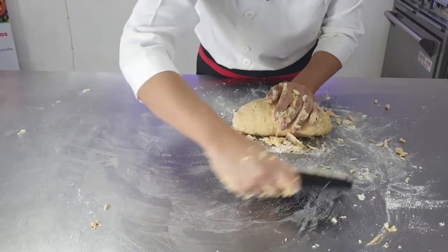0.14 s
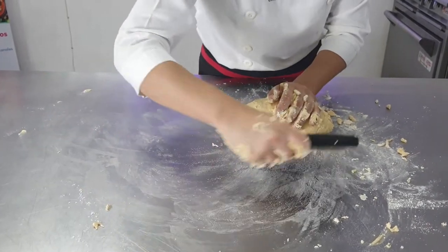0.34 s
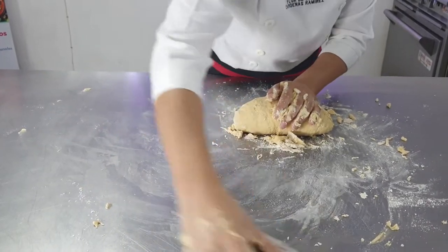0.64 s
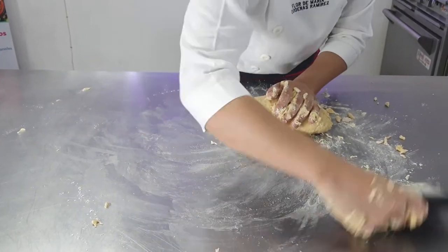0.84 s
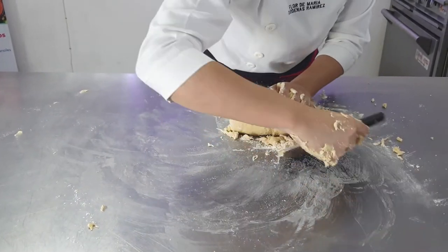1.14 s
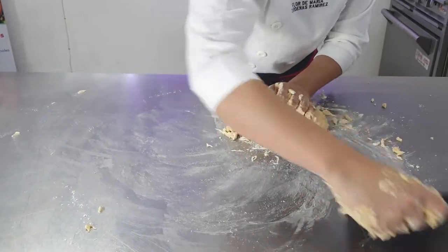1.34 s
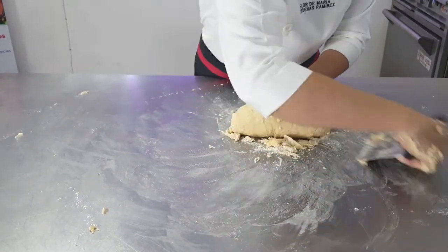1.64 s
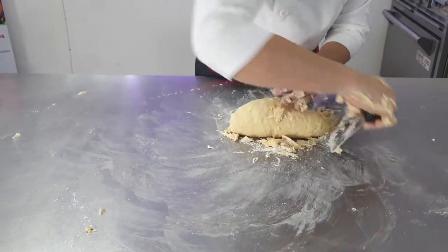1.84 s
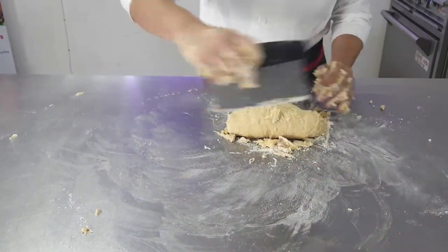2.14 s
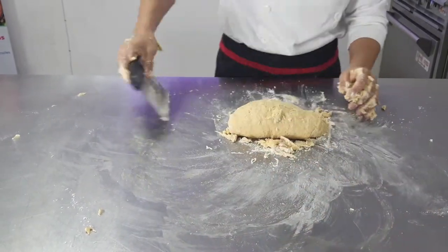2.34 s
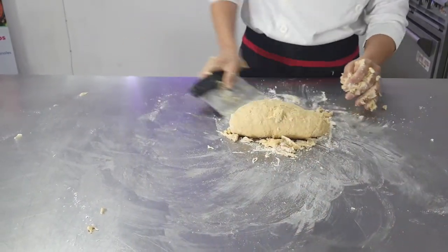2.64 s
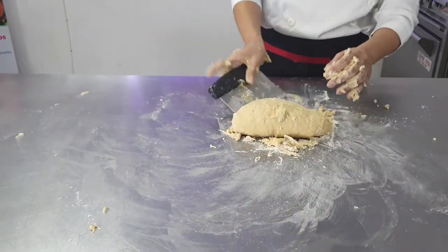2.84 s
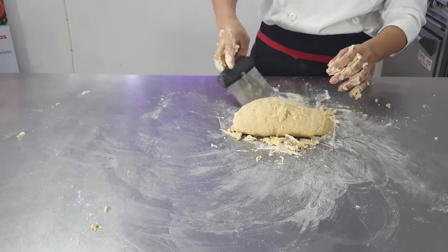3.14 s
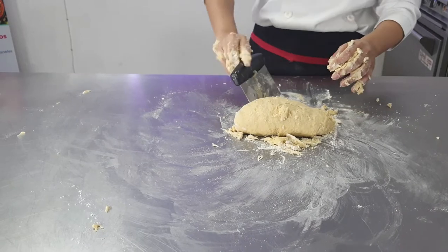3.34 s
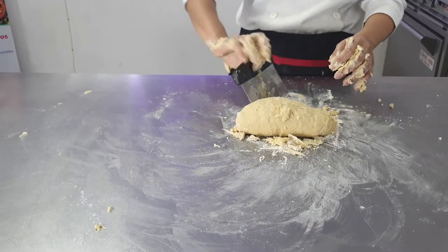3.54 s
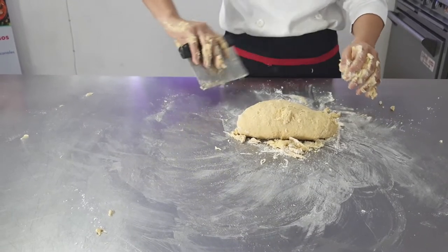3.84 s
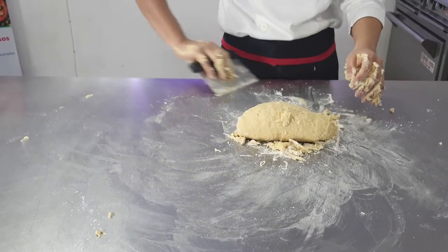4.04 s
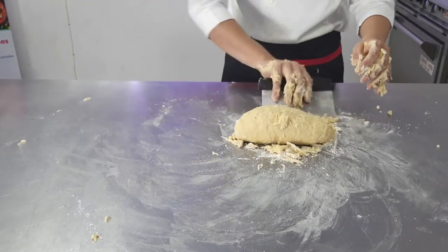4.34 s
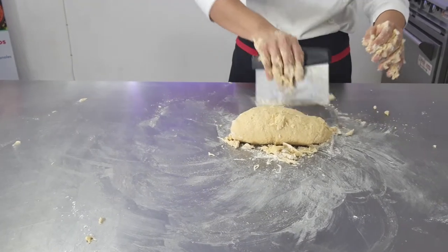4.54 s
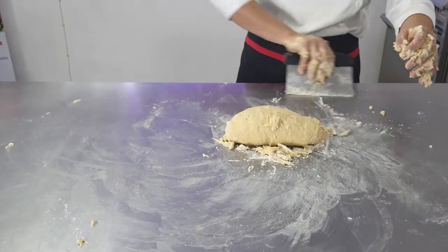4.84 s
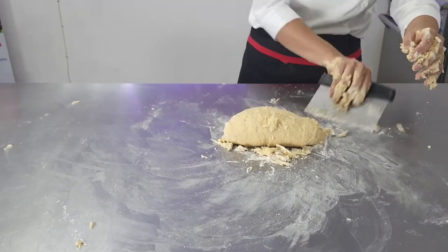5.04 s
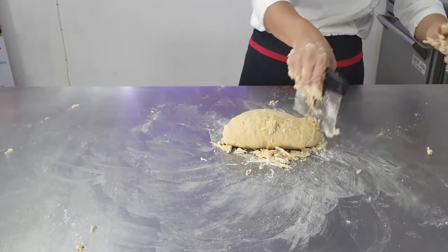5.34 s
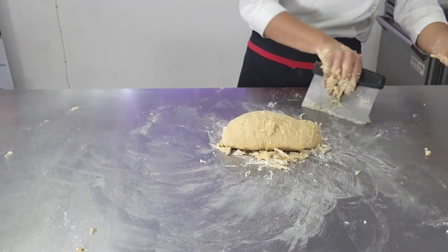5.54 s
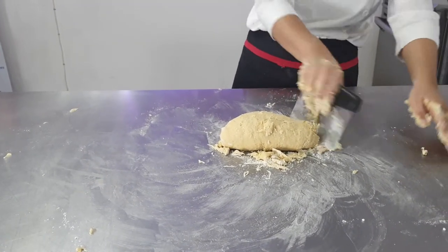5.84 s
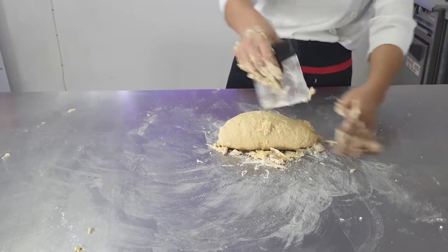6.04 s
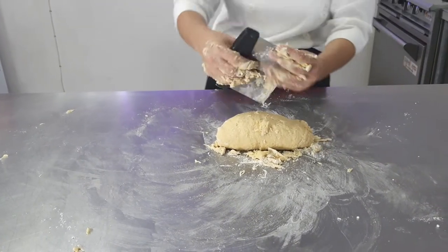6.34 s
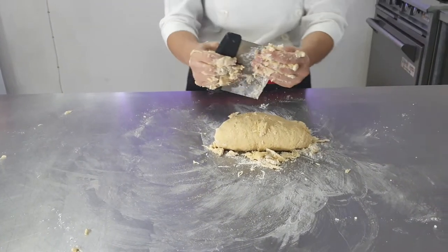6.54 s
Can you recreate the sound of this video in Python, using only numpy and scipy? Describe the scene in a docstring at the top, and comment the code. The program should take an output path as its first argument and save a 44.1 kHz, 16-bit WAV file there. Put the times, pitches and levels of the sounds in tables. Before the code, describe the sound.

A metal bench scraper lands with hollow clangs on a floured steel table and scrapes in short, hissing, raspy strokes in a quiet kitchen.

```python
"""A hard-walled kitchen with a low ventilation hum; a steel bench scraper works on a floured steel table.
Each landing rings the sheet top: summed decaying modes plus a crowd of upper modes made from noise.
Strokes toward the dough are shaped noise: bright flour hiss, steel rasp and the hand-damped blade's ring.
Catches ring the blade briefly, soft handling adds rubs, and the top rumbles under pushes and leaning weight."""
import sys
import numpy as np
from scipy import signal
from scipy.fft import rfft, irfft, next_fast_len
from scipy.io import wavfile

SR = 44100
rng = np.random.default_rng(int(sys.argv[2]) if len(sys.argv) > 2 else 0)


def write(x):
    x = np.atleast_2d(x).T
    wavfile.write(sys.argv[1], SR, np.round(np.clip(x, -1, 1) * 32767).astype(np.int16))

N = 294279
T = np.arange(N) / SR  # seconds

# Pushes of the edge toward the dough. Each row: fastest at in seconds, speeding up in seconds,
# slowing down in seconds, then relative levels in dB of flour hiss, rasp, blade ring and final bite,
# and extra lower hiss of a flat-held blade in dB.
STROKES = [(0.172, 0.23, 0.11, -36.5, -34, -44, -51, 6.5), (0.841, 0.27, 0.25, -33, -41.5, -36, -37, 6.5),
           (1.575, 0.2, 0.25, -28, -38, -43, -42, 3.5), (2.661, 0.24, 0.135, -35.5, -41.5, -45.5, -51.5, 1),
           (4.199, 0.2, 0.27, -39, -51, -66.5, -46, -4), (5.03, 0.18, 0.2, -30, -39, -54, -44, -1),
           (5.71, 0.13, 0.14, -36.5, -45.5, -62.5, -45.5, -4),
           (6.048, 0.18, 0.16, -46.5, -58, -83, -61, -1)]
# Blade lands on a corner, falls flat, then the heel of the hand settles. Each row: start in seconds,
# flat after in seconds, settled after in seconds, boom of the top in dB, corner clang in dB,
# flat clang in dB, edge tick in dB, extra of the deep belly modes in dB, hardness in dB per octave,
# favoured pitch of the spot in Hz, ring length as a factor.
LANDINGS = [(-0.1, 0.018, 0.04, -32.5, -48, -38.5, -60, -12.5, -13.5, 310, 1.8),
            (0.593, 0.018, 0.04, -26, -29.5, -31.5, -51, -2, 0.5, 338, 0.75),
            (1.378, 0.015, 0.071, -25, -35.5, -38, -58, 0, -4, 317, 0.85),
            (2.422, 0.02, 0.05, -24, -27.5, -29.5, -43, -5, 2.7, 680, 0.86),
            (2.886, 0.006, 0.012, -63.5, -53.5, -63.5, -64.5, 1, 1, 546, 0.053),
            (3.974, 0.026, 0.053, -23, -26, -33.5, -61, 1, 0.5, 900, 0.9),
            (4.312, 0.012, 0.03, -46.5, -37, -40.5, -47, 3.5, 0.5, 992, 0.6),
            (4.805, 0.02, 0.036, -28, -34.5, -30, -58.5, 10.5, -1, 592, 0.92),
            (5.547, 0.011, 0.057, -25.5, -31.5, -24, -54.5, 4.5, 0, 900, 0.78)]
# Edge catches on dried dough and springs free. Each row: start in seconds, blade ring in dB,
# snap in dB, ring t60 in seconds.
CATCHES = [(0.085, -41.5, -68.5, 0.22), (0.17, -34.5, -43.5, 0.18), (0.775, -28, -30.5, 0.065),
           (0.799, -46, -27, 0.043), (1.488, -40, -45, 0.19), (1.55, -32, -32.5, 0.24),
           (2.077, -82.5, -65, 0.025), (2.271, -81.5, -76, 0.03), (2.606, -45, -60, 0.098),
           (4.096, -42, -58, 0.17), (4.132, -63, -47.5, 0.045), (4.324, -40, -52, 0.12),
           (4.96, -42.5, -45.5, 0.3), (6.161, -58, -66, 0.09)]
# Short drags over flour and dough. Each row: centre in seconds, half length in seconds,
# relative hiss in dB, relative rasp in dB.
BRUSHES = [(0.77, 0.035, -35.5, -42.5), (0.803, 0.039, -29, -48), (2.11, 0.12, -60.5, -70),
           (2.925, 0.11, -64.5, -63), (2.986, 0.055, -54, -62), (3.22, 0.071, -61, -59),
           (3.372, 0.065, -64.5, -75.5), (3.62, 0.08, -74, -92), (3.838, 0.06, -70.5, -67),
           (3.927, 0.065, -72, -73.5), (4.127, 0.059, -51, -42), (4.496, 0.081, -63, -69),
           (5.439, 0.22, -73, -75.5), (6.602, 0.11, -66.5, -81), (6.665, 0.045, -65, -64.5)]
# Soft bumps, pats and rubs of hands, sleeve and dough. Each row: start in seconds, centre in Hz,
# level in dB, rise in seconds.
HANDLING = [(2.07, 2080, -68, 0.038), (2.27, 498, -59, 0.0036), (2.937, 1920, -75, 0.071),
            (3.106, 300, -48.5, 0.013), (3.19, 1930, -79, .025), (3.351, 4030, -66, 0.023),
            (5.143, 760, -41, 0.007), (5.15, 300, -43, 0.027), (5.96, 1541, -62.5, 0.017),
            (6.304, 423, -57.5, 0.041), (6.366, 385, -63, 0.03), (6.481, 1070, -68, 0.02)]
# The cook's weight shifts on the top. Each row: centre in seconds, half length in seconds, rumble in dB.
LEANS = [(0.362, 0.15, -38.5), (0.637, 0.11, -32), (2.053, 0.23, -43.5), (2.325, 0.17, -42),
         (2.882, 0.22, -36), (3.243, 0.37, -42.5), (4.068, 0.16, -34.5), (4.714, 0.19, -45.5),
         (5.384, 0.31, -42.5), (6.408, 0.18, -41)]
# Modes of the steel top. Each row: frequency in Hz, relative level in dB, t60 in seconds before scaling.
TOP_MODES = [(66.8, -7, .7), (91, -5.5, 0.23), (127, 5.5, 0.19), (148, -4.5, 0.96), (173, -6, 0.45),
             (184.3, -6.5, 0.65), (246, -4.5, 0.2), (267.3, -4, 0.49), (306.6, 5, 0.22),
             (297.5, -1.5, 0.89), (311.4, -2, 1), (318, -1, 0.21), (361.7, -1, 0.3), (386.5, -6, 0.55),
             (425.6, -5, 0.17), (537.5, -12.5, 0.52), (609, -11.5, 0.45), (663.7, -14.5, 0.41),
             (897, -21, 0.77), (1077, -13.5, 0.25)]
# Crowded upper modes of the top. Each row: frequency in Hz, relative level in dB.
CLANG_SPECTRUM = [(100, -13), (300, -3), (470, -4.5), (700, 5), (830, -5.5), (1100, -3.5), (1450, -7.5),
                  (1750, -9), (2050, -8), (2900, -22), (4300, -27), (6000, -44.5), (16000, -49)]
# Their decay. Each row: frequency in Hz, t60 in seconds before the landing's length factor.
CLANG_T60 = [(200, 1), (700, 0.11), (2000, 0.33), (8000, 0.75)]
# Modes of the hand-damped blade. Each row: frequency in Hz, width in Hz, relative level in dB.
BLADE_MODES = [(866, 53, -2), (1083, 180, 5), (1246, 260, -1.5), (1620, 110, -3.5), (2030, 200, -0.5),
               (2580, 110, -18.5), (3620, 140, -8), (3980, 240, -17), (4130, 1000, -15)]
# Spectra of edge snap, flour hiss, steel rasp, flexing top and moving air.
# Each row: frequency in Hz, relative level in dB.
SNAP_SPECTRUM = [(300, -25), (1500, -9.5), (4200, 2.5), (6000, -6.5), (8200, 3), (12000, -7.5),
                 (16000, -5.5)]
HISS_SPECTRUM = [(1000, -28), (4000, -5), (6000, -11), (8200, -6.5), (9500, -6.5), (10700, -3), (11700, 1),
                 (12600, -4), (13500, -0.5), (14500, -9), (16000, -3)]
RASP_SPECTRUM = [(100, -24), (300, 7), (520, 0), (750, 5.5), (1100, -3.5), (1500, -0.5), (2100, 3),
                 (2900, -3.5), (4000, -5.5), (5500, -9), (8000, -14), (16000, -48)]
FLEXING_SPECTRUM = [(25, -35.5), (40, -31.5), (56, 5), (70, 0.5), (90, 1.5), (115, -6.5), (160, -22.5),
                    (300, -25), (450, -34.5), (1000, -57)]
AIR_SPECTRUM = [(25, -35), (40, 2), (60, -6), (130, -8.5), (200, -24), (260, -22.5), (400, -29), (700, -34),
                (1100, -44.5), (1900, -36), (2600, -51), (6000, -54.5), (8000, -49.5), (16000, -63.5)]
# Ventilation hum. Each row: frequency in Hz, mean level in dB.
HUM = [(59.2, -57), (231.5, -67)]
# Likeness of the two microphone ports. Each row: frequency in Hz, likeness 0-1.
LIKENESS = [(60, .99), (300, .98), (500, .65), (1000, .2), (2000, .04), (16000, 0)]
# Colour of the ports. Each row: frequency in Hz, left minus right in dB.
PORTS = [(60, -5.5), (200, -6), (400, -3.5), (750, -4.5), (1100, -6.5), (1550, -7.5), (2100, -4.5),
         (3000, -3.5), (6400, 1), (8200, -6), (10200, -3), (11600, -6), (12800, -2), (15500, -2.5)]
# Decay of the room. Each row: frequency in Hz, t60 in seconds.
KITCHEN_T60 = [(100, 0.93), (1000, 0.39), (4000, 0.077), (14000, 0.3)]

AIR_DB = -55.5
TOP_HZ = 15900  # upper band limit
STROKE_EDGE_DB = 29  # fall of an arch after its rise or fall time
HISS_ARCH, RASP_ARCH = 2.01, 1.34  # exponents: higher is flatter on top
RASP_SPAN = 1.235  # rasp needs less speed, so lasts this much longer than hiss
BITE_AT, BITE_S = 0.61, 0.12  # share of the slowing down; half length
REST_RUMBLE_DB, PUSH_RUMBLE_DB = -48, -38  # resting hands; firm push
FIRM_RASP_DB = -34  # rasp of a firm push; a lighter one loads the top less
CORNER_BOOM_DB, SETTLE_BOOM_DB = -4.5, -3.5  # relative to the flat fall
SETTLE_CLANG_DB, FLAT_TICK_DB = -12, -7  # relative to the flat clang; to the corner tick


def undb(db):
    """Decibels to gain."""
    return np.exp(np.asarray(db) * (np.log(10) / 20))


def unit(x):
    """Scale to rms 1."""
    return x / np.sqrt(np.mean(x ** 2))


def at_hz(points, hz):
    """Read (Hz, value) points on a log-frequency axis."""
    f, value = np.transpose(points)
    return np.interp(np.log(np.maximum(hz, 1)), np.log(f), value)


def shape(x, gain):
    """Filter by a gain that is a function of frequency."""
    size = next_fast_len(x.shape[-1] + 4096, real=True)
    spectrum = rfft(x.astype(np.float32), size)
    hz = np.arange(spectrum.shape[-1], dtype=np.float32) * np.float32(SR / size)
    return irfft(spectrum * gain(hz).astype(np.float32), size)[..., :x.shape[-1]]


def colour(x, points):
    """Shape x by a (Hz, dB) spectrum, at rms 1."""
    return unit(shape(x, lambda hz: undb(at_hz(points, hz))))


def resonance(hz, centre_hz, width_hz):
    """Gain of one resonance with steep skirts."""
    return 1 / (1 + (2 * (hz - centre_hz) / width_hz) ** 2)


def band_pass(x, centre_hz, width_hz):
    """One resonance with steep skirts, applied to a sound."""
    section = np.concatenate(signal.iirpeak(centre_hz, centre_hz / width_hz, fs=SR))
    return signal.sosfilt([section, section], x)


def diffuse(size):
    """Noise at two close ports: alike in the bass, unrelated in the treble."""
    def mid_side_gain(hz):
        likeness = np.clip(at_hz(LIKENESS, hz), 0, 1)
        return np.sqrt(1 + np.array([[1], [-1]]) * likeness)

    mid, side = shape(rng.standard_normal((2, size), dtype=np.float32), mid_side_gain)
    return np.array([mid + side, mid - side]) / np.sqrt(2)


def fade(t, t60_s):
    """Exponential decay."""
    return np.exp(-np.log(1000) * t / t60_s)


def die_away(x, t60s):
    """Let every octave of x decay at its own rate."""
    out = 0
    for centre_hz in 2. ** np.arange(5, 15):
        band = shape(x, lambda hz: np.maximum(1 - abs(np.log2((hz + 1) / centre_hz)), 0))
        out = out + band * fade(T[:x.shape[-1]], at_hz(t60s, centre_hz))
    return out


def walk(rate_hz):
    """A random wander of spread 1, with `rate_hz` new targets a second."""
    steps = rng.standard_normal(8192)
    return unit(np.interp(T * rate_hz, np.arange(len(steps)), steps))


def arch(s, rise_s, fall_s, power=2):
    """Gain of one sweep of the arm: swells to 1 at time s and dies down again."""
    gain = np.zeros(N)
    near = (T > s - 3 * rise_s) & (T < s + 3 * fall_s)
    away = np.maximum((s - T[near]) / rise_s, (T[near] - s) / fall_s)
    gain[near] = undb(-STROKE_EDGE_DB * away ** power)
    return gain


def add(track, s, sound):
    """Mix a sound into the track at time s; it may have begun before 0."""
    i = int(s * SR)
    sound, i = sound[..., max(-i, 0):], max(i, 0)
    track[:, i:i + sound.shape[-1]] += sound[..., :N - i]


def strike(ring, db):
    """Scale a ring so that its first 20 ms have the given level."""
    return ring * undb(db) / np.sqrt(np.mean(ring[..., :SR // 50] ** 2))


def ventilation(waver_db=1, waver_hz=15):
    """Steady moving air as shaped noise, with hum tones that waver in level."""
    hum = 0
    for hz, db in HUM:
        level = np.sqrt(2) * undb(db + waver_db * walk(waver_hz))
        hum = hum + level * np.sin(2 * np.pi * hz * T)
    return colour(diffuse(N), AIR_SPECTRUM) * undb(AIR_DB) + hum


def kitchen(x, wet_db, first_wall_s=0.01):
    """Add the diffuse answer of the hard walls: decaying noise as the room's impulse response."""
    tail = die_away(diffuse(SR), KITCHEN_T60) * (T[:SR] > first_wall_s)
    tail = unit(tail) / np.sqrt(SR)  # unit energy
    return x + undb(wet_db) * signal.fftconvolve(x, tail, axes=1)[:, :N]


def flexing(push_span=1.58, load_share=0.18, push_lag=0.35, wander_db=0.5, wander_hz=7):
    """The wide top rumbles in its lowest modes under each push and as weight shifts on it."""
    pushes, leans = np.zeros((2, N))
    for s, rise_s, fall_s, _, rasp_db, *_ in STROKES:
        weight = undb(load_share * (rasp_db - FIRM_RASP_DB))
        pushes += weight * arch(s + push_lag * fall_s, push_span * rise_s, push_span * fall_s)
    for s, half_s, db in LEANS:
        leans += undb(db) * arch(s, half_s, half_s)
    load = np.sqrt(undb(REST_RUMBLE_DB) ** 2 + (undb(PUSH_RUMBLE_DB) * pushes) ** 2 + leans ** 2)
    return colour(diffuse(N), FLEXING_SPECTRUM) * load * undb(wander_db * walk(wander_hz))


def handling(width_share=0.42):
    """Soft contacts swell and die, each a noise in its own band."""
    out, t = np.zeros((2, N)), T[:SR // 2]
    for s, centre_hz, db, rise_s in HANDLING:
        rub = unit(shape(diffuse(len(t)), lambda hz: resonance(hz, centre_hz, width_share * centre_hz)))
        swell = t / rise_s * np.exp(1 - t / rise_s)  # peaks at 1
        add(out, s, undb(db) * rub * swell)
    return out


def snap(t60_s):
    """The short bright crack of the steel edge: fading noise."""
    t = T[:SR // 4]
    return colour(diffuse(len(t)), SNAP_SPECTRUM) * fade(t, t60_s)


def catches(snap_t60_s=0.06):
    """The blade snags, lets go with a snap and rings briefly in the hand."""
    def blade_gain(hz):
        return sum(undb(db) * resonance(hz, f, width_hz) for f, width_hz, db in BLADE_MODES)

    out, t = np.zeros((2, N)), T[:SR // 4]
    for s, ring_db, snap_db, ring_t60_s in CATCHES:
        ring = shape(diffuse(len(t)), blade_gain)
        add(out, s, strike(ring * fade(t, ring_t60_s), ring_db))
        add(out, s, strike(snap(snap_t60_s), snap_db))
    return out


def landings(spot_db=6, spot_width=0.22, scatter_db=7.0, travel=0.1299, spread_s=0.004, tick_t60_s=0.045,
             deep_hz=230, contact_s=0.0008, deep_length=0.86, belly_hz=150, belly_width_hz=130):
    """Contacts ring the top; the spot favours some modes, a pressing blade damps all but the deep ones."""
    out, t = np.zeros((2, N)), T[:SR]
    hz, db, t60_s = np.transpose(TOP_MODES)[:, :, None]
    swell = 1 - np.exp(-t / spread_s)  # bending waves take a moment to fill the sheet
    lag = travel * np.sqrt(hz)  # in cycles: grows with the root of frequency
    waves = swell * np.sin(2 * np.pi * (hz * t - lag))
    for (s, flat_s, settled_s, boom_db, corner_db, flat_db, tick_db,
         deep_db, hardness, spot_hz, length) in LANDINGS:
        def favour(f):
            """Extra dB of the modes that swing widest at this spot."""
            return spot_db * resonance(f, spot_hz, spot_width * spot_hz)

        mode_db = db + deep_db * resonance(hz, belly_hz, belly_width_hz) + favour(hz)
        mode_t60_s = t60_s * np.where(hz < deep_hz, deep_length, length)
        modes = undb(mode_db) * waves * fade(t, mode_t60_s)

        crowd = diffuse(SR // 2)  # each spot wakes its own crowd of upper modes
        clang = shape(crowd, lambda f: undb(at_hz(CLANG_SPECTRUM, f) + hardness * np.log2(f + 100) + favour(f)))
        clang = die_away(clang, [(f, decay_s * length) for f, decay_s in CLANG_T60])
        clang = clang * (1 - np.exp(-t[:SR // 2] / contact_s))

        contacts = [(s, boom_db + CORNER_BOOM_DB, corner_db),
                    (s + flat_s, boom_db, flat_db),
                    (s + settled_s, boom_db + SETTLE_BOOM_DB, flat_db + SETTLE_CLANG_DB)]
        for when_s, low_db, clang_db in contacts:
            scatter = undb(scatter_db * rng.standard_normal(hz.shape))
            boom = (scatter * modes).sum(axis=0)
            add(out, when_s, strike(boom, low_db))
            add(out, when_s, strike(clang, clang_db))
        add(out, s, strike(snap(tick_t60_s), tick_db))
        add(out, s + flat_s, strike(snap(tick_t60_s), tick_db + FLAT_TICK_DB))
    return out


def stroke_gains(brush_ring_db=-7, bite_ring_db=-6):
    """Hiss swells with each sweep; rasp and ring last longer and flare as the edge digs in before stopping."""
    hiss, lower, rasp, ring = np.zeros((4, N))
    for s, rise_s, fall_s, hiss_db, rasp_db, ring_db, bite_db, flat_db in STROKES:
        landed_s = max(row[0] for row in LANDINGS if row[0] < s)
        touching = T >= landed_s  # silent until the blade has landed
        slide = undb(hiss_db) * touching * arch(s, rise_s, fall_s, HISS_ARCH)
        grip = touching * arch(s, RASP_SPAN * rise_s, RASP_SPAN * fall_s, RASP_ARCH)
        bite = undb(bite_db) * arch(s + BITE_AT * fall_s, BITE_S, BITE_S)
        hiss += slide
        lower += (undb(flat_db) - 1) * slide
        rasp += np.hypot(undb(rasp_db) * grip, bite)
        ring += np.hypot(undb(ring_db) * grip, undb(bite_ring_db) * bite)
    for s, half_s, hiss_db, rasp_db in BRUSHES:
        touch = arch(s, half_s, half_s)
        hiss += undb(hiss_db) * touch
        rasp += undb(rasp_db) * touch
        ring += undb(rasp_db + brush_ring_db) * touch
    return hiss, lower, rasp, ring


def blade_ring(friction, turns_db=3, turns_hz=32):
    """The point of contact wanders along the edge, so the blade's modes take turns."""
    ring = 0
    for hz, width_hz, db in BLADE_MODES:
        ring = ring + undb(db + turns_db * walk(turns_hz)) * band_pass(friction, hz, width_hz)
    return unit(ring)


def sheet(x, rebound=0.5, ring_t60_s=0.06, above_hz=600):
    """Bending waves rebound from the rims and comb everything above the boom with fine metallic peaks."""
    t = T[:SR // 8]
    echoes = unit(rng.standard_normal((2, len(t))) * fade(t, ring_t60_s)) / np.sqrt(len(t))
    upper = signal.sosfilt(signal.butter(1, above_hz, "high", fs=SR, output="sos"), x)
    rebounds = signal.fftconvolve(upper, echoes, axes=1)[:, :N]
    return x + (np.sqrt(1 - rebound ** 2) - 1) * upper + rebound * rebounds


def scraping(hiss_db=-1.0, rasp_db=0, ring_db=-3.0, grain_db=0.05, grain_hz=1100, slip_db=-0.43, slip_hz=170,
             patch_db=2.2, patch_hz=40, lower_hz=7000, lower_width_hz=5000):
    """Flour grains crush evenly under the edge, which sticks and slips over thick and thin patches."""
    hiss_gain, lower_gain, rasp_gain, ring_gain = stroke_gains()
    grains = undb(grain_db * walk(grain_hz))
    slips_db = slip_db * walk(slip_hz) + patch_db * walk(patch_hz)
    hiss = colour(diffuse(N) * grains * undb(slips_db / 2), HISS_SPECTRUM)
    lower = shape(hiss, lambda hz: resonance(hz, lower_hz, lower_width_hz))
    rasp = colour(diffuse(N) * grains * undb(slips_db), RASP_SPECTRUM)
    ring = blade_ring(diffuse(N) * grains * undb(slips_db))
    flour = undb(hiss_db) * (hiss_gain * hiss + lower_gain * lower)
    steel = undb(rasp_db) * rasp_gain * rasp + undb(ring_db) * ring_gain * ring
    return flour + steel


def scene():
    """Blows and strokes in the room, over the table's rumble and the ventilation."""
    blows = kitchen(landings() + catches(), wet_db=-12)
    strokes = kitchen(sheet(scraping()) + handling(), wet_db=-10.5)
    return blows + strokes + flexing() + ventilation()


def record(dry):
    """Each port has its own colour, the right mostly louder; the deepest bass and the top are cut."""
    halves = np.array([[0.5], [-0.5]])  # left, right share of the difference
    heard = shape(dry, lambda hz: undb(halves * at_hz(PORTS, hz)))
    heard = signal.sosfilt(signal.butter(3, 38, "high", fs=SR, output="sos"), heard)
    return signal.sosfilt(signal.ellip(12, 0.1, 80, TOP_HZ, fs=SR, output="sos"), heard)


dry = scene()
out = record(dry)
write(out)
```